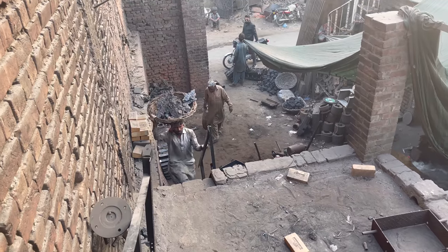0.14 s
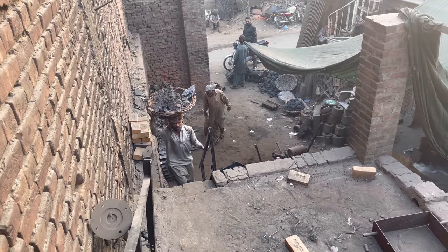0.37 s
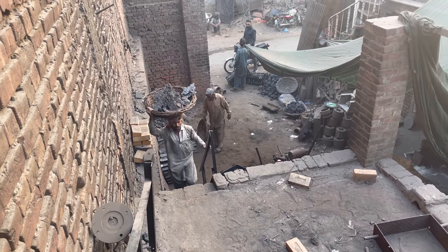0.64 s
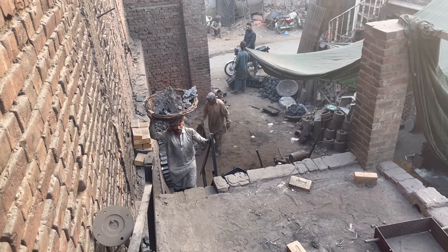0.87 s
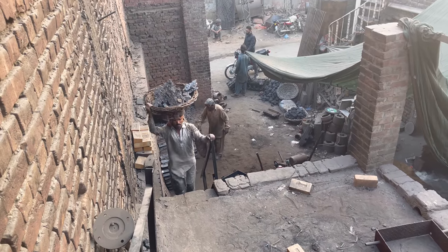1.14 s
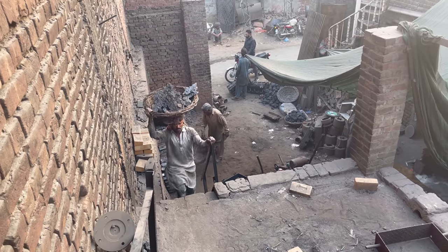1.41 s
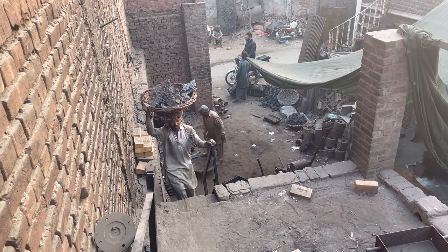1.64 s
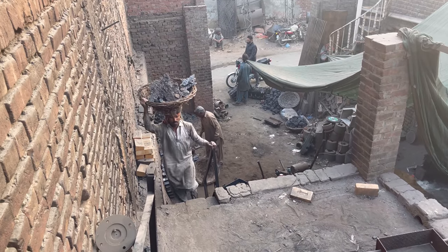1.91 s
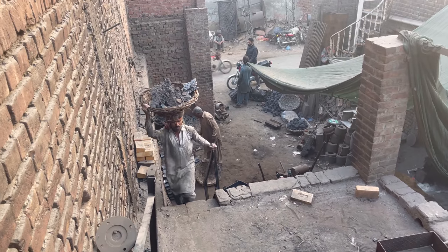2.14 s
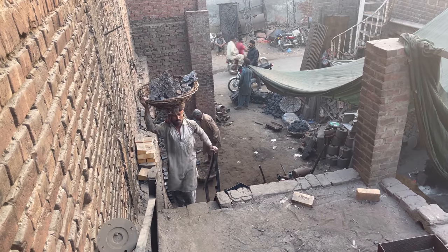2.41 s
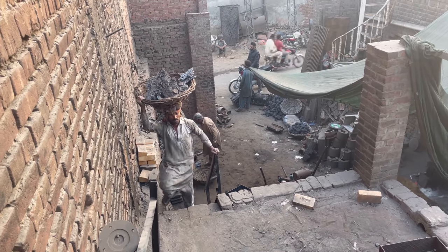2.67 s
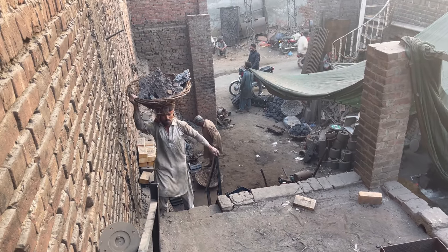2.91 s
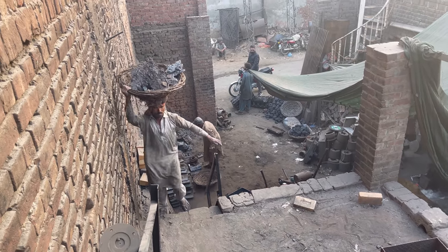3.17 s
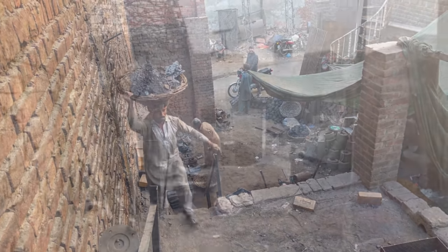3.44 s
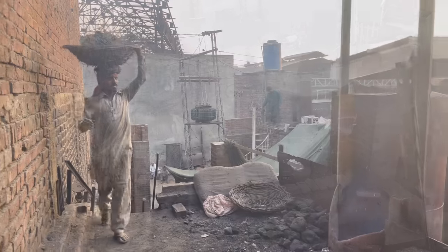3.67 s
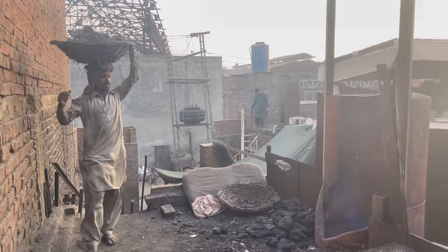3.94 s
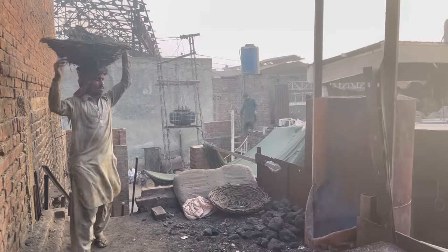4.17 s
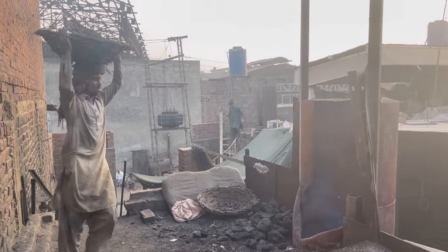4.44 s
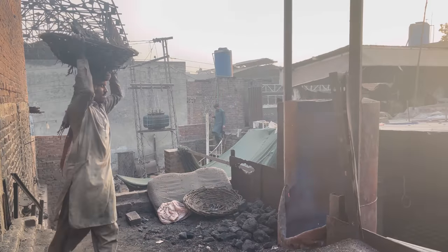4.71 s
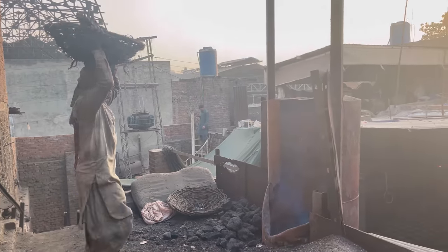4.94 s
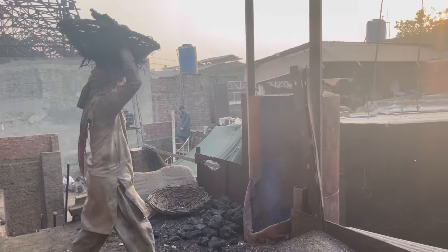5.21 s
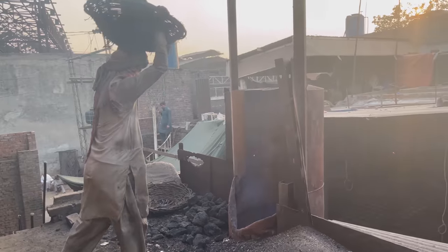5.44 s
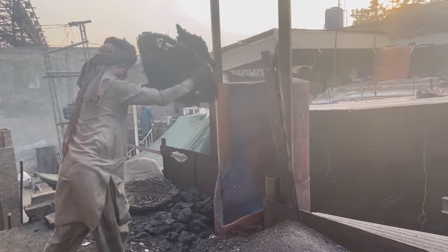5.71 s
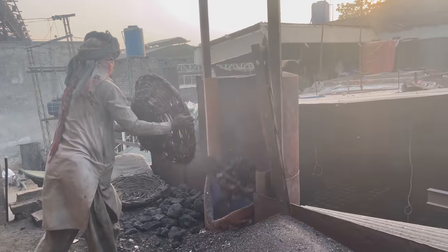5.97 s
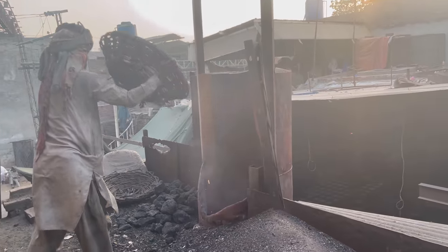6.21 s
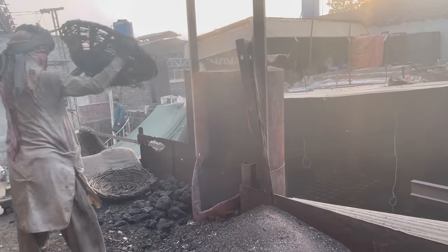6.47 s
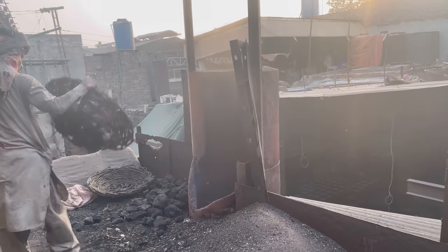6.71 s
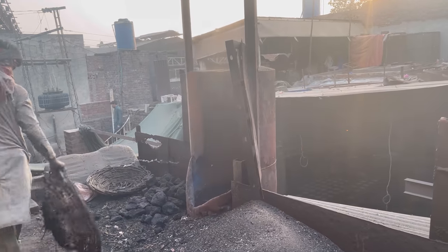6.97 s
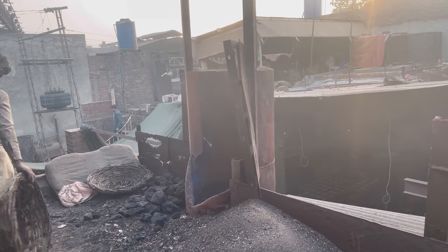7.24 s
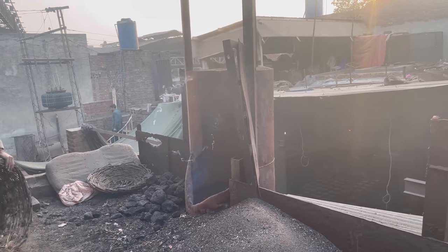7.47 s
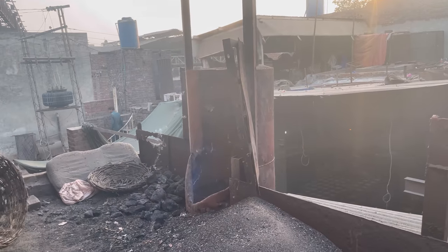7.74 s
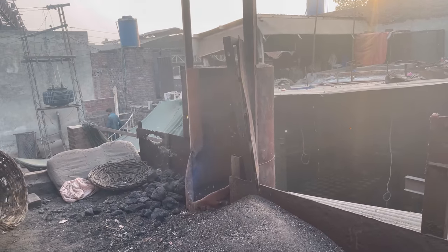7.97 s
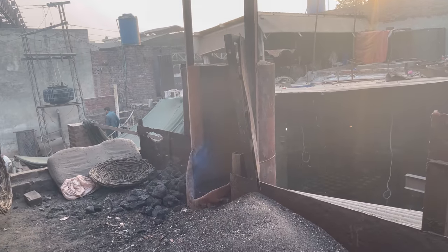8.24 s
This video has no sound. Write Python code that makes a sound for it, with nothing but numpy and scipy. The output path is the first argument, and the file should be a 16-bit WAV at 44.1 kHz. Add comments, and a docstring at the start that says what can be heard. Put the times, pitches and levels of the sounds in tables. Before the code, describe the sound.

Handheld stereo microphone near a furnace: first above a stair, then beside the charging door, always under a thick low roar and blower drone. Small grit scrapes and sharp coke ticks mark the climb and steps. A basketful of lumps is then tipped in, a short dense burst of clatter and dull iron thuds, before the roar recovers with a faint high fan whistle and tiny clinks.

```python
"""Cupola furnace on a foundry roof

Two ports of a handheld microphone hear a blown furnace, first above a stair, then beside the charging door.
Air and flame roar as coloured, flickering noise; the blower's hum and whistle are sines sharing one speed.
A far tone with its octave swells and sags, and grit scrapes as band-limited noise.
Grit and coke crunch as clouds of tiny decaying rings, and single lumps clink out of them.
A basket of coke thuds into the iron door, ringing its modes, and the gain control ducks."""
import sys
import numpy as np
from scipy import signal
from scipy.fft import rfft, irfft, next_fast_len
from scipy.io import wavfile
from scipy.ndimage import uniform_filter1d, minimum_filter1d, map_coordinates

SR = 44100
rng = np.random.default_rng(int(sys.argv[2]) if len(sys.argv) > 2 else 0)


def level_to_linear(level):
    """Convert decibel levels to linear amplitude factors, elementwise."""
    exponent = np.asarray(level, float) / 20
    return 10 ** exponent


def wav_out(sig):
    """Save sig, one row per channel (or a flat mono array), as 16-bit PCM at SR to the path in sys.argv[1]."""
    wavfile.write(sys.argv[1], SR, np.round(np.clip(np.atleast_2d(sig).T, -1, 1) * 32767).astype(np.int16))


N = 369116
M = next_fast_len(N, True)  # transform length
# (start [s], end [s]): the stair fades into the door stand, later the shade moves off the door
TO_DOOR, UNSHADE = (2.96, 3.94), (5.85, 6.55)


def walk(rate):
    """Random levels held 1 / rate s and slewed twice; spread near 1."""
    hold = int(SR / rate)
    steps = np.repeat(rng.standard_normal(N // hold + 1), hold)
    return 1.46 * uniform_filter1d(uniform_filter1d(steps, hold), hold)[:N]


def ramp(start, end):
    """0 before start, 1 after end, straight between."""
    return np.clip((np.arange(N) / SR - start) / (end - start), 0, 1)


def swell(start, rise, hold, fall, db):
    """Rise, hold and fall of a passing sound."""
    top = start + rise + hold
    return level_to_linear(db) * ramp(start, start + rise) ** 2 * (1 - ramp(top, top + fall)) ** 2


def stand_gains():
    """Gain of each stand: stair, shaded door, open door."""
    fade_bend = 1.273  # the stair leaves faster than the door arrives (1 = straight)
    warm_db_per_s = .5  # the stair grows louder as the microphone turns to it
    door, clear = ramp(*TO_DOOR), ramp(*UNSHADE)
    stair = (1 - door) ** fade_bend * level_to_linear(warm_db_per_s * (np.arange(N) / SR - 1.5))
    return stair, door * np.sqrt(1 - clear), np.sqrt(clear)


def wall_comb(f):
    """Echoes off nearby walls comb the upper noise into fine fixed ripples."""
    lags = rng.uniform(.006, .04, 6)  # s
    echo = level_to_linear(-22) * np.clip(f / 1000, 0, 1)  # full strength from 1 kHz up
    comb = 1 + echo * sum(np.exp(-2j * np.pi * f * lag) for lag in lags)
    return comb / np.sqrt(1 + len(lags) * echo ** 2)


def field(colour, pair, flicker_db, rate):
    """Noise at two ports: the right one hears a phase-shifted share of the left; octave bands flicker alone."""
    hz, *side_db = np.transpose(colour)
    pair_hz, like, lead = np.transpose(pair)
    f = np.fft.rfftfreq(M, 1 / SR)
    octave = np.log2(np.maximum(f, 1))
    near, far = rfft(rng.standard_normal((2, M)))
    like = np.interp(f, pair_hz, like).clip(0, 1)
    shared = like * np.exp(1j * np.interp(f, pair_hz, lead)) * near
    right = shared + np.sqrt(1 - like ** 2) * far
    gains = [level_to_linear(np.interp(octave, np.log2(hz), db)) for db in side_db]
    in_range = (f >= hz[0]) & (f < hz[-1])
    both = np.sqrt(SR / 2) * np.array([near, right]) * gains * wall_comb(f) * in_range
    out = np.zeros((2, N))
    for band in np.arange(np.floor(np.log2(hz[0])), np.log2(hz[-1]) + 1):
        share = np.clip(1 - abs(octave - band), 0, 1)  # neighbouring bands overlap and sum to one
        out += level_to_linear(flicker_db * walk(rate)) * irfft(both * share, M)[:, :N]
    return out


# Roar spectrum at each stand, before its trim and fade: (frequency [Hz], left level [dB per Hz],
# right level [dB per Hz], likeness of the ports [0-1], right port lead [rad])
STAIR_ROAR = [(25, -62, -65.0, 0.98, -8), (40, -54.0, -57, 1.0, -1.5), (64, -39.5, -41.5, 1.0, 0),
              (98, -34.5, -37, 1.0, 0.24), (135, -39.5, -43, 0.92, 0.14), (150, -38, -42.5, 0.98, 0.5),
              (175.6, -43, -55.5, 0.94, -0.8), (189, -43, -51.5, 0.9, -0.7),
              (214, -54.5, -51.5, 0.26, -1.2), (221, -60, -48.4, 0.46, 2.1), (232, -51, -48, 0.78, 2),
              (259, -52.3, -50.5, 0.9, 1.6), (300, -58.5, -52, 0.18, 4.0), (343, -57.2, -48.5, 0.75, 6.5),
              (391, -58.5, -59, 0.45, 6.0), (430, -56.5, -58.2, 0.6, 5), (483, -57, -57.5, 0.4, 8),
              (520, -49.5, -54.4, 0.57, 7.5), (614, -51, -51, 0.8, 8.5), (681, -56, -50, 0.8, 8.5),
              (780, -57.5, -55.5, 0.63, 7.5), (910, -50.5, -54.5, 0.4, 7.5), (1113, -53.5, -57.5, 0.58, 9),
              (1180, -62.5, -60, 0.5, 8.7), (1456, -57, -58, 0.94, 9.0), (1680, -59.5, -59.5, 0.73, 9),
              (1880, -62, -61.5, 0.86, 10), (2170, -62, -63, 0.7, 10.5), (2300, -69.5, -65, 0.65, 9.5),
              (2560, -69, -68.1, 0.53, 11.5), (2780, -70, -72, 0.54, 9.5), (3302, -73.5, -75, 0.54, 9.6),
              (4233, -80.4, -83.5, 0.1, 5.5), (5119, -78.5, -83.5, 0.15, 9.5),
              (5589, -81, -83.4, 0.01, 9.8), (5925, -79, -87, 0.4, 15), (6191, -82, -82, 0.5, 12),
              (6564, -81.5, -84.5, 0.37, 12.1), (7166, -87, -85.5, 0.06, 12.5),
              (7709, -85.7, -83.5, 0.5, 14), (8294, -86.5, -85, 0.37, 13), (8540, -88.0, -87.1, 0.44, 18)]
SHADED_DOOR_ROAR = [(25, -61.7, -63.1, 0.99, 0.1), (40, -48, -54, 0.92, -0.5), (64, -40.5, -40, 0.88, -0.1),
                    (73, -41.5, -47, 0.99, -0.0), (107, -38, -39.5, 1, 0.0), (121, -41, -43.5, 0.99, 0.6),
                    (153, -39.9, -42.5, 0.88, -0.4), (173, -48, -55.5, 0.75, -1.3),
                    (188, -45, -56, 0.52, 1.2), (205, -50, -45, 0.67, 1.1), (234, -52.5, -57.5, 0.84, 1.3),
                    (275, -55.5, -54.5, 0.69, 1.2), (293, -55.5, -53, 0.73, 1.1),
                    (316, -57.3, -51, 0.45, -0.5), (326, -56.5, -51.5, 0.78, -0.6),
                    (406, -59, -63, 0.61, -0.3), (490, -51.5, -54.5, 0.68, 0), (554, -48, -55.5, 0.61, 0),
                    (610, -50, -54.5, 0.4, 0.7), (770, -55, -52.5, 0.87, 1), (830, -55, -62.5, 0.29, 0.3),
                    (860, -56.6, -58, 0.19, -1.5), (900, -55, -57, 0.16, -2.2),
                    (1020, -56, -60.2, 0.4, -2.0), (1186, -60, -59.5, 0.31, -3.5),
                    (1300, -60.0, -62, 0.38, -6), (1470, -55.5, -57.5, 0.43, -5),
                    (1750, -64, -62, 0.65, -4.5), (2160, -64.5, -59.5, 0.52, -6),
                    (2440, -67.7, -64.5, 0.76, -7.5), (2650, -66, -61, 0.88, -7),
                    (3100, -68, -68, 0.21, -8.5), (3400, -71.5, -66.5, 0.38, -7.8),
                    (3711, -73, -72, 0.13, -9), (3993, -76.3, -73, 0.16, -12),
                    (4488, -75.5, -77, 0.42, -10.5), (5045, -77, -80.5, 0.13, -15.5),
                    (5589, -78.1, -80, 0.34, -16), (5925, -77.5, -80, 0.44, -20.5),
                    (6858, -84.5, -84.5, 0.41, -18.5), (7166, -86.5, -83.6, 0.22, -18.8),
                    (8540, -84, -85.5, 0.36, -18)]
OPEN_DOOR_ROAR = [(25, -64.4, -65.9, 0.94, 3), (40, -50, -50, 0.92, -0.5), (63.5, -41, -43.5, 0.99, -0.0),
                  (102, -41.5, -44.5, 1, -0.5), (126, -43.5, -45, 0.82, -0.1),
                  (151, -38, -43.5, 0.93, -0.5), (173, -51, -52.9, 0.8, -1), (179, -48, -58, 0.52, 0.7),
                  (200, -48.8, -52, 0.97, -0.4), (231, -57.5, -58, 0.92, 1.5), (263, -57.5, -52, 0.56, 0.6),
                  (276, -56, -56.5, 0.75, 0.2), (298, -59, -55, 0.83, 0.7), (328, -58, -61, 0.77, -1.5),
                  (391, -59, -62.5, 0.81, 0.1), (424, -50, -54.6, 0.77, -0.8), (493, -48.5, -51, 0.64, 0),
                  (563, -49, -59.1, 0.68, 1), (633, -54, -54.5, 0.79, 0.6), (900, -56.0, -55, 0.91, -1.9),
                  (935, -51, -55.5, 0.17, -2), (1007, -55, -66, 0.19, -1), (1120, -59.5, -60, 0.32, -4),
                  (1220, -59.5, -60.5, 0.63, -7), (1360, -54.5, -54.5, 0.45, -6.5),
                  (1480, -56.5, -63.5, 0.05, -10), (1613, -58.5, -59.5, 0.85, -11),
                  (1787, -67.5, -67, 0.67, -12.0), (2068, -62.5, -59, 0.83, -12.5),
                  (2340, -71.5, -67, 0.47, -13), (2900, -68, -64, 0.86, -15), (3390, -69, -68.5, 0.85, -15),
                  (3993, -80.5, -72, 0.37, -16), (4270, -74.5, -79, 0.14, -17.5),
                  (4554, -79, -80, 0.28, -21), (4829, -79.2, -79.5, 0.43, -20),
                  (5589, -80, -82.5, 0.33, -23), (6375, -82, -83.1, 0.38, -26.5),
                  (6759, -83.9, -83.0, 0.28, -26.5), (7166, -88, -83.7, 0.22, -30),
                  (7709, -85.6, -86, 0.33, -31), (8500, -86.8, -87.8, 0.33, -30)]
# Thin hiss on top, the same spectrum at every stand: (frequency [Hz], level [dB per Hz])
TOP_HISS_COLOUR = [(8400, -102.5), (8700, -84), (9300, -85), (10000, -79), (10600, -83), (11100, -85),
                   (11600, -93.5), (12000, -83), (12500, -121.4)]
# How the top reaches the two ports: (frequency [Hz], likeness [0-1], right port lead [rad])
TOP_PORT_PAIR = [(8400, 0.2, 0.0), (8750, 0.8, 0.3), (9500, 0.8, 1.6), (9800, 0.97, 3.0), (10300, 1.0, 3.2),
                 (11300, 0.65, 5.0), (11650, 1.0, 6.3)]


def roar():
    """Air and flame off brick and iron: coloured noise, one stand fading into the next, under a thin top hiss."""
    stands = ((STAIR_ROAR, 0.6), (SHADED_DOOR_ROAR, 0.16), (OPEN_DOOR_ROAR, 0.17))  # (spectrum, trim [dB])
    body = np.zeros((2, N))
    for (table, trim_db), gain in zip(stands, stand_gains()):
        rows = np.array(table)
        noise = field(rows[:, :3], rows[:, [0, 3, 4]], flicker_db=1.42, rate=3.98)
        body += level_to_linear(trim_db) * gain * noise
    # the handheld microphone sways, so the resonances slide a little up and down
    slide = .011 * walk(2.5)
    place = np.arange(N) + np.cumsum(slide - uniform_filter1d(slide, SR))
    body = np.array([map_coordinates(port, [place], order=2, mode="mirror") for port in body])
    door = ramp(*TO_DOOR)
    hiss_gain = np.hypot(door, 1 - door)  # dips midway between the stands
    return body + hiss_gain * field(TOP_HISS_COLOUR, TOP_PORT_PAIR, flicker_db=-0.6, rate=6)


# Blade whistle: (start [s], rise [s], hold [s], fall [s], level before flicker [dB rms])
BLADE_SWELL = (6, 1, .5, 3., -41)


def blower():
    """Shaft hum and blade whistle share one slightly wavering speed; the hum is out of step at the two stands."""
    shaft_hz, blades = 51.85, 18
    stair_db, sag_db_per_s, shaded_db, open_db = -24, 1, -19, -20
    step_rad, fade_bend = 1.95, 1.6  # hum phase at the stair against the door; bend of the door's fade-in
    turn = 2 * np.pi * np.cumsum(shaft_hz * (1 + 0.00147 * walk(3.18))) / SR
    door, clear = ramp(*TO_DOOR), ramp(*UNSHADE)
    stair_gain = (1 - door) * level_to_linear(stair_db - sag_db_per_s * np.arange(N) / SR)
    door_gain = door ** fade_bend * level_to_linear(shaded_db + clear * (open_db - shaded_db))
    hum = stair_gain * np.sin(turn + step_rad) + door_gain * np.sin(turn)
    hum *= level_to_linear(1.2 * walk(4))
    whistle = swell(*BLADE_SWELL) * level_to_linear(2.0 * walk(6)) * np.sin(blades * turn)
    hum_pan = level_to_linear(np.array([[.8], [-.8]]))  # dB, left and right
    return np.sqrt(2) * (hum * hum_pan + whistle)


# Passing tone: (start [s], rise [s], hold [s], fall [s], level before octave, flicker and pan [dB rms])
FAR_TONE_SWELL = (0.52, 0.12, 0.28, .2, -36)


def far_tone():
    """A wavering sine with its octave that swells, sags in pitch and fades."""
    start_hz, sag_hz_per_s, octave_db = 558, 88, -5
    sag_start = FAR_TONE_SWELL[0] + FAR_TONE_SWELL[1]
    sag_time = (np.arange(N) / SR - sag_start).clip(0, .35)
    hz = start_hz - sag_hz_per_s * sag_time
    turn = 2 * np.pi * np.cumsum(hz * (1 + 0.007 * walk(18.0))) / SR
    tone = np.sin(turn) + level_to_linear(octave_db) * np.sin(2 * turn)
    tone *= level_to_linear(4.5 * walk(22.0))
    pan = level_to_linear(np.array([[3.], [-3.]]))  # dB, left and right
    return np.sqrt(2) * swell(*FAR_TONE_SWELL) * tone * pan


# Grit strokes: (start [s], rise [s], hold [s], fall [s], level before flicker and port mix [dB])
SCRAPE_STROKES = [(1.5, 0.28, 0.12, 0.4, -28), (3.65, 0.28, 0.094, .25, -41), (5.88, 0.14, .01, .02, -31)]


def scrape():
    """Grit scrapes as uneven broad noise, fullest around 1-3 kHz, partly shared between the ports."""
    band = signal.butter(1, [820, 3400], "band", fs=SR, output="sos")
    noise = rng.standard_normal((3, N))
    shared, *own = signal.sosfilt(band, signal.sosfilt(band, noise))
    strokes = sum(swell(*row) for row in SCRAPE_STROKES) * level_to_linear(2.0 * walk(18))
    return strokes * (0.49 * shared + 0.81 * np.array(own)) / shared.std()


# Bursts of grit and coke: (start [s], level before scatter, tilt and pan [dB], t60 [s],
# lowest ring [Hz], highest ring [Hz])
CRUNCH_BURSTS = [(1.018, -36, 0.57, 2280, 7000), (2.111, -18.5, 0.063, 4000, 13300),
                 (2.12, -33.5, .4, 2000, 9000), (2.164, -24.5, 0.2, 4000, 13270),
                 (2.168, -21, 0.32, 900, 9000), (4.068, -21, 0.2, 3400, 11200),
                 (4.073, -24, 0.37, 2300, 7000), (5.986, -26, 0.038, 3000, 12100),
                 (6.024, -7.5, 0.035, 1520, 12500), (6.033, -12, 0.051, 750, 11100),
                 (6.0607, -4, .14, 1290, 12400), (6.071, -5, .07, 500, 12000),
                 (6.079, 3.5, .07, 603, 11740), (6.088, 1, 0.054, 600, 11300),
                 (6.096, 2.5, 0.046, 504, 8900), (6.11, -15, .7, 298, 2480),
                 (6.105, -20.5, .3, 2600, 12100), (6.158, -15.5, 0.27, 1310, 10400),
                 (7.134, -25.5, .031, 3500, 11100), (7.745, -44, .3, 1200, 4000),
                 (8.14, -37, 0.96, 3496, 9000)]


def crunch(count=1000):
    """Many small lumps, each ringing briefly at its own pitch and with its own lag between the ports."""
    ring_s, scatter_db, port_lag_s = .0012, 2.8, .00045
    out = np.zeros((2, N + SR))
    t = np.arange(240) / SR
    for s, db, t60, low_hz, high_hz in CRUNCH_BURSTS:
        rise = .09 * t60 ** 1.5  # s; short crunches start far more sharply
        when, pitch, size, side = rng.random((count, 4)).T
        span = rise + .6 * t60
        when = when * span
        shape = np.clip(when / rise, 0, 1) * level_to_linear(-60 * np.clip(when - rise, 0, None) / t60)
        hz = low_hz * (high_hz / low_hz) ** pitch
        gain = level_to_linear(db - scatter_db * np.log(1 - size)) * shape
        gain *= level_to_linear(-2.5 * np.log2(hz / low_hz))  # lower rings are louder: 2.5 dB per octave
        gain /= np.sqrt(count * ring_s / span)  # level independent of how densely the lumps fall
        rings = gain[:, None] * np.exp(-t / ring_s) * np.sin(2 * np.pi * hz[:, None] * t)
        start = ((s + when) * SR).astype(int)
        right_lag = port_lag_s * (1 + 0.75 * (side - .5))
        for port, lag in zip(out, (0 * side, right_lag)):
            first = start + (lag * SR).astype(int)
            np.add.at(port, first[:, None] + np.arange(len(t)), rings)
    return out[:, :N]


# Lumps ringing alone: (time [s], level before chatter and pan [dB], frequency [Hz], t60 [s])
LUMP_CLINKS = [(2.111, -26, 5700, .025), (2.112, -28, 5100, .025), (2.113, -24.5, 2580, .04),
               (4.069, -23, 3970, 0.062), (4.079, -24, 4900, 0.07), (4.08, -23, 3900, .07),
               (4.069, -34, 7700, .025), (4.074, -32, 6100, .08), (4.1, -31, 4200, .08),
               (4.094, -30, 5530, .07), (5.44, -38, 4700, .15), (6.0246, -4, 2790, 0.037),
               (6.026, -12, 3570, .03), (6.063, -15, 1950, .03), (6.064, -18, 2930, .03),
               (6.094, -9, 1990, .035), (6.088, -10, 3800, .03), (6.027, -19, 6000, .02),
               (6.066, -15, 8850, 0.034), (6.074, -13, 9000, 0.044), (6.081, -8, 2950, 0.034),
               (6.1, -18, 3220, 0.069), (6.081, -1, 2050, 0.027), (6.088, -9, 2510, 0.04),
               (6.12, -24, 5750, 0.09), (6.136, -24, 3700, .03), (6.138, -24, 3150, .03),
               (6.163, -14, 2100, .03), (6.171, -8, 1980, 0.027), (7.745, -38.5, 4320, .35),
               (7.748, -32, 2640, .2), (7.76, -37, 3370, .3), (7.93, -44, 3370, .25),
               (8.149, -43, 4130, .3), (8.195, -39, 4350, .15), (8.2, -41, 4030, .2), (8.24, -44, 4850, .2),
               (8.285, -39, 4200, 0.2), (8.29, -40, 4420, .12)]


def clinks():
    """Single lumps ring out of the crunch as decaying sines, roughened as they chatter against neighbours."""
    rough = .6
    out, t = np.zeros(N + SR), np.arange(int(.2 * SR)) / SR
    for s, db, hz, t60 in LUMP_CLINKS:
        ring = np.clip(t / 0.0014, 0, 1) * level_to_linear(db - 60 * t / t60) * np.sin(2 * np.pi * hz * t)
        chatter = uniform_filter1d(rng.standard_normal(len(t)), size=90)
        roughness = 1 - rough / 2 + rough * chatter / chatter.std()
        out[int(s * SR):int(s * SR) + len(t)] += ring * roughness
    return np.array([out[:N], out[:N]])


def door_to_ports(x, pan_db):
    """The door reaches the left port first."""
    lag = int(.0002 * SR)
    return np.array([x * level_to_linear(pan_db / 2), np.roll(x, lag) * level_to_linear(-pan_db / 2)])


# Coke striking the iron door: (time [s], level before the push, modes and scatter [dB])
DOOR_BLOWS = [(6.0242, -11), (6.0273, 5), (6.033, -4), (6.038, -5), (6.045, -13), (6.066, -10),
              (6.071, 3.5), (6.077, -5), (6.083, -4.5), (6.091, -2), (6.101, -3), (6.108, -4), (6.17, -6),
              (6.19, 0)]
# Ringing modes of the iron door: (frequency [Hz], level before each blow's scatter [dB], t60 [s])
IRON_DOOR_MODES = [(227, -3, 0.049), (298, -7, 0.042), (415, -3.5, 0.089), (527, -2, 0.045),
                   (640, -11, .04), (783, -3, .07), (864, -6, 0.04), (1020, -13, 0.033), (1310, -13, .035),
                   (1750, -18, .05), (1950, -8, 0.055), (2760, -8, 0.025), (3350, -9, .04),
                   (3570, -15, .04)]


def thuds():
    """Each blow is a few ms of rattling push that rings the door's modes in a mix of its own."""
    scatter_db = 2
    t = np.arange(int(.1 * SR)) / SR
    rings = np.array([level_to_linear(db - 60 * t / t60) * np.sin(2 * np.pi * hz * t) for hz, db, t60 in IRON_DOOR_MODES])
    out = np.zeros(N)
    for s, db in DOOR_BLOWS:
        rattle = 0.057 * rng.standard_normal(200) * np.exp(-np.arange(200) / 30)
        rattle[0] = 0.26  # first contact
        mix = level_to_linear(db + scatter_db * rng.standard_normal(len(rings)))
        blow = np.convolve(rattle, mix @ rings)[:len(t)]
        out[int(s * SR):int(s * SR) + len(t)] += blow
    return door_to_ports(out, pan_db=2)


def near_ports(x):
    """Small near sources lack deep bass and very top; their top reaches the ports much as the top hiss does."""
    low_hz, high_hz, likeness = 190, 12400, .93
    peak_hz, peak_width_hz, peak_db = 10800, 1400, 4  # cavity resonance of the ports
    f = np.fft.rfftfreq(M, 1 / SR)
    pair_hz, like, lead = np.transpose(TOP_PORT_PAIR)
    like = likeness * np.interp(f, pair_hz, like, left=0)
    lead = np.interp(f, pair_hz, lead)
    peak = level_to_linear(peak_db * np.exp(-((f - peak_hz) / peak_width_hz) ** 2))
    low_cut = 1 + (low_hz / np.maximum(f, 1)) ** 4
    high_cut = 1 + (f / high_hz) ** 12
    left, right = peak * rfft(x, M) / low_cut / high_cut
    right = like * np.exp(1j * lead) * left + np.sqrt(1 - like ** 2) * right
    return irfft([left, right], M)[:, :N]


def scene():
    """Everything on the roof; the lumps are louder on the right."""
    lump_pan_db = -2.5  # left over right
    lumps = (crunch() + clinks()) * level_to_linear(lump_pan_db / 2 * np.array([[1], [-1]]))
    return roar() + blower() + far_tone() + near_ports(scrape() + lumps + thuds())


def gain_control(x, top_db, depth):
    """Bright overloads pull the gain down; it holds a while, then slews back."""
    hold, slew = int(.155 * SR), int(.08 * SR)
    bright = signal.sosfilt(signal.butter(2, 400, "high", fs=SR, output="sos"), x)
    power = uniform_filter1d((bright ** 2).mean(0), int(0.045 * SR))
    over_db = np.clip(10 * np.log10(power + 1e-12) - top_db, 0, None)
    # the shifted windows look back, so the gain recovers late
    held = minimum_filter1d(-depth * over_db, hold, origin=(hold - 1) // 2)
    return x * level_to_linear(uniform_filter1d(held, slew, origin=(slew - 1) // 2))


def roll_off(x):
    """The treble ends steeply here."""
    return signal.sosfilt(signal.butter(12, 12930, fs=SR, output="sos"), x)


def record(dry):
    """Gain control, then softly rounded peaks."""
    level = gain_control(dry, top_db=-15.5, depth=1.0)
    mix = np.tanh(1.071 * level) / 1.103
    return roll_off(mix)


dry = scene()
out = record(dry)
wav_out(out)
```